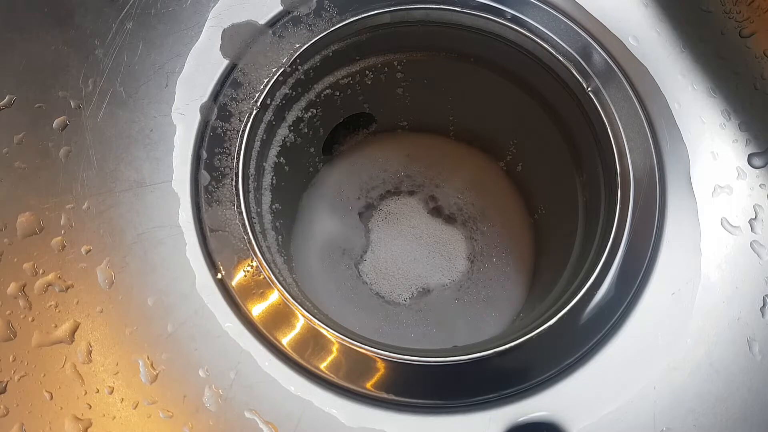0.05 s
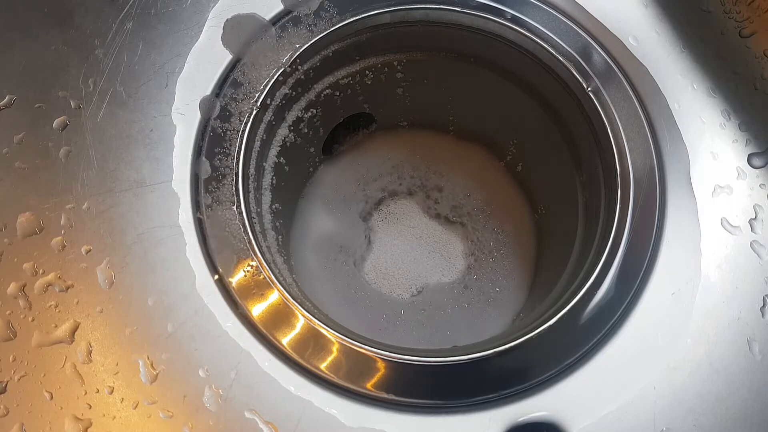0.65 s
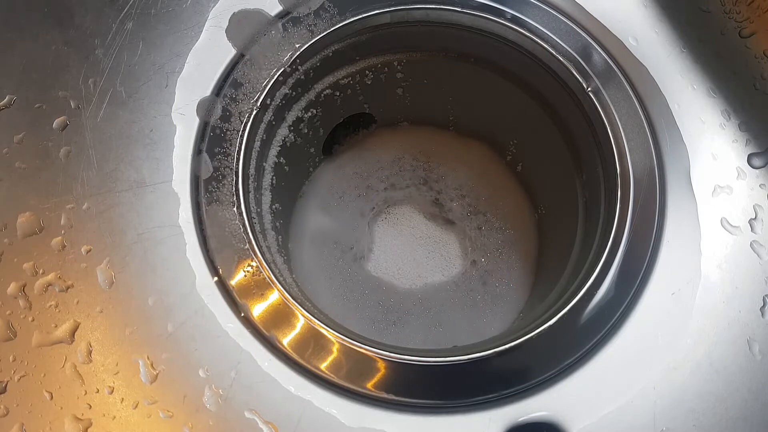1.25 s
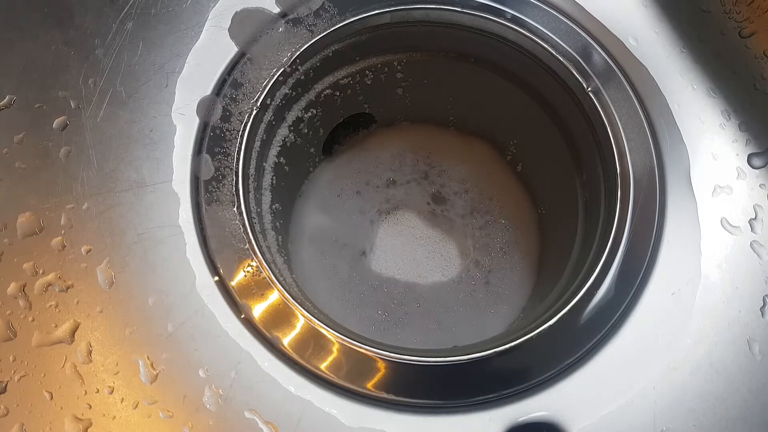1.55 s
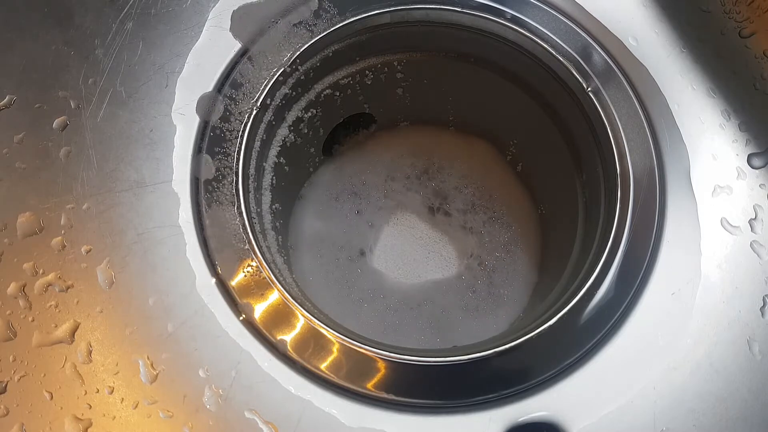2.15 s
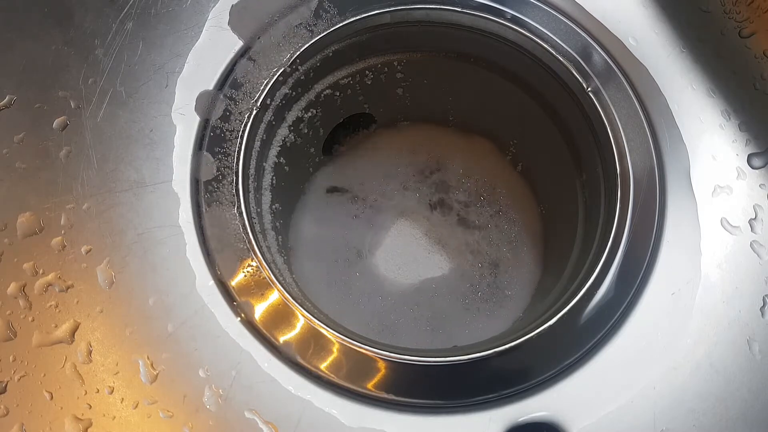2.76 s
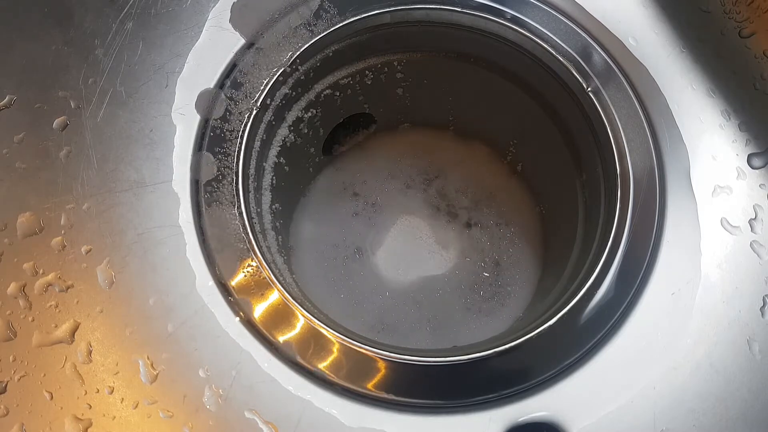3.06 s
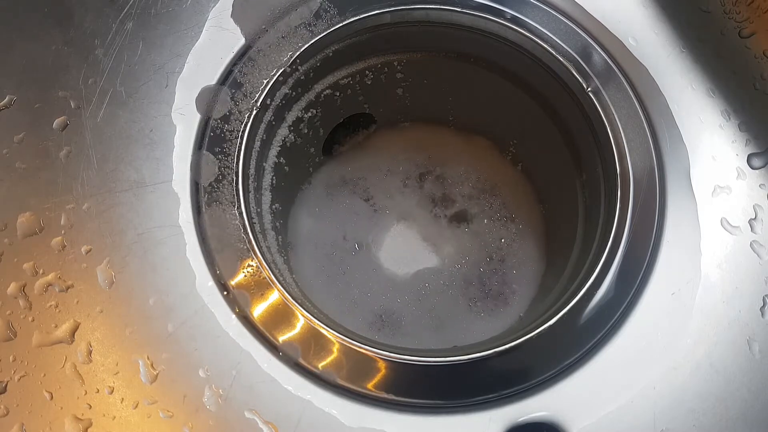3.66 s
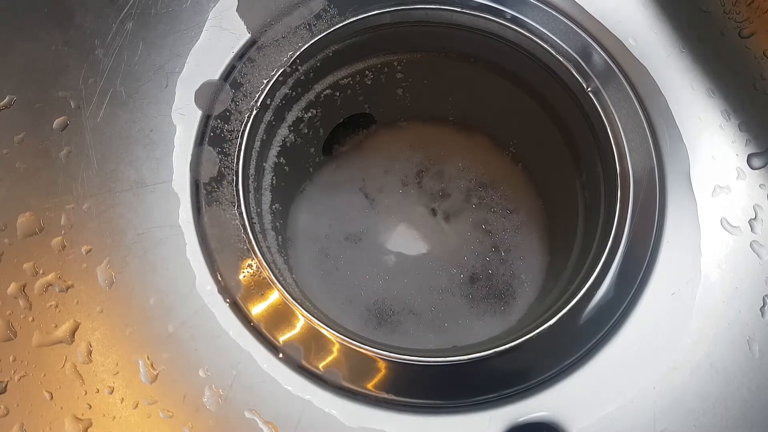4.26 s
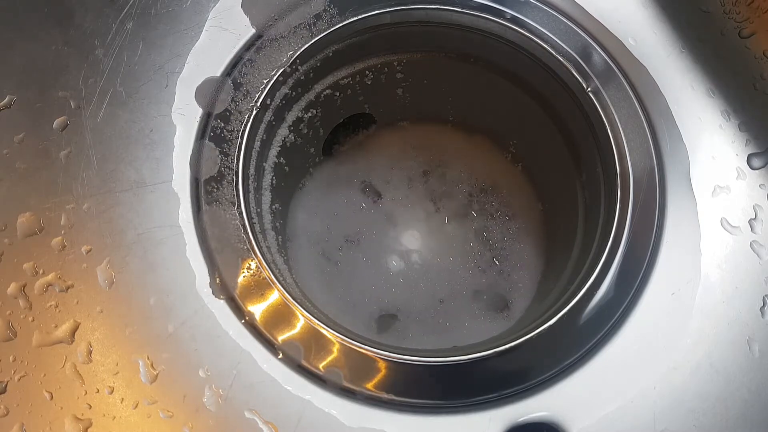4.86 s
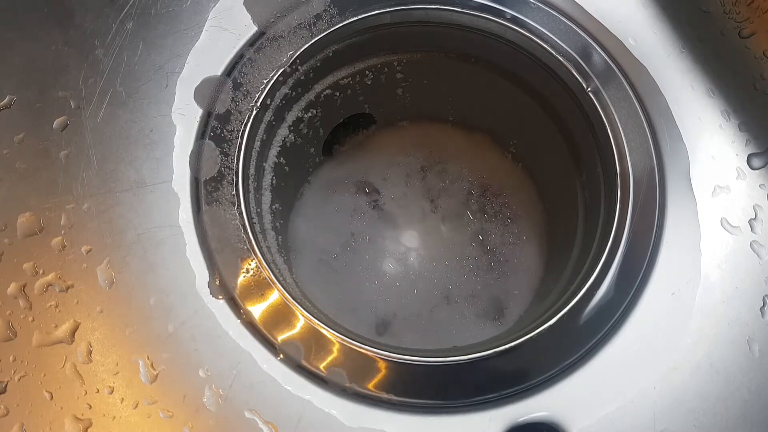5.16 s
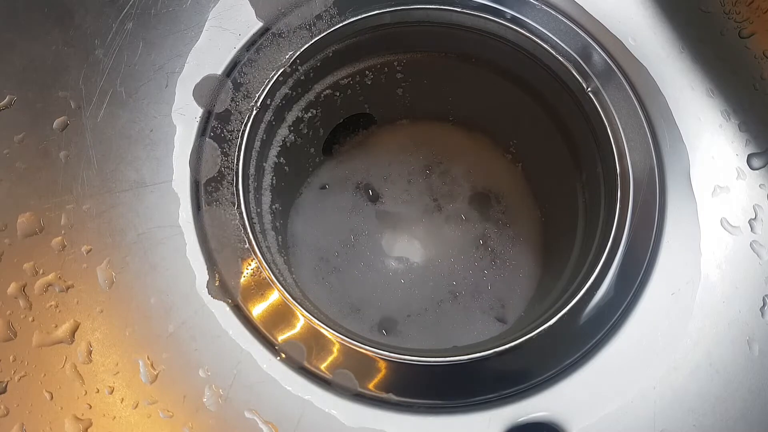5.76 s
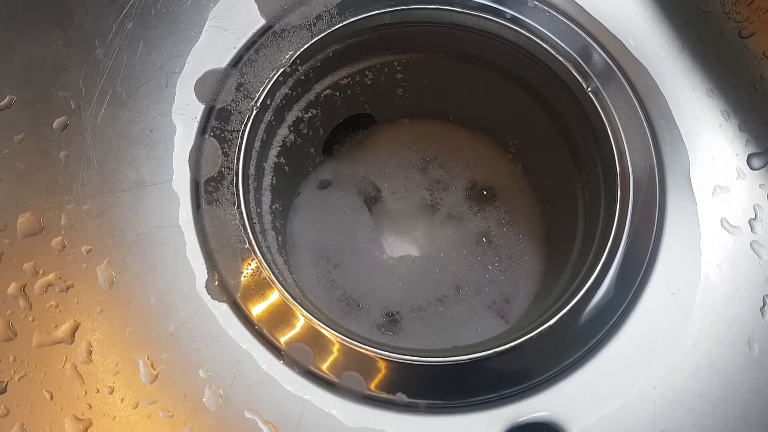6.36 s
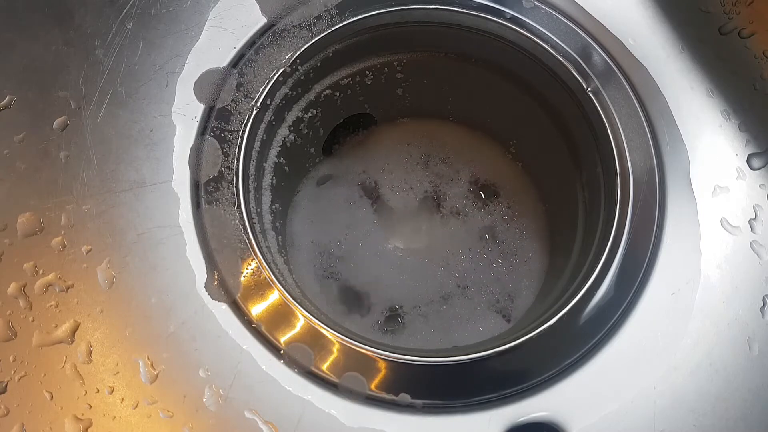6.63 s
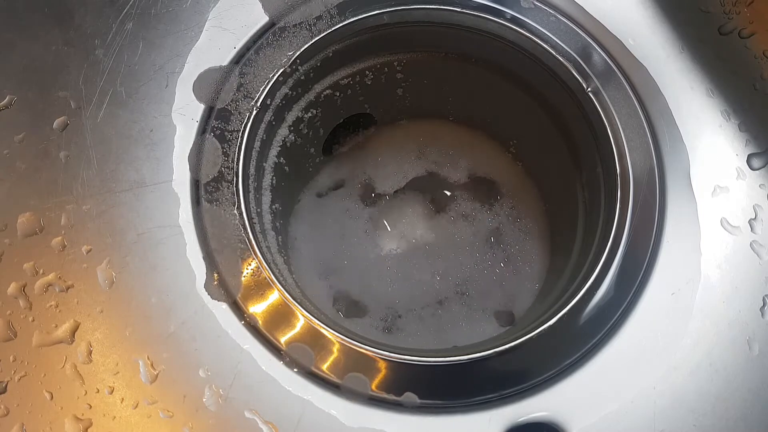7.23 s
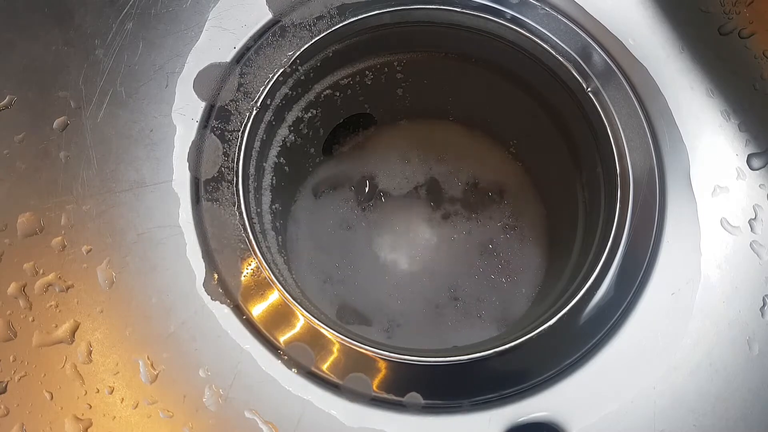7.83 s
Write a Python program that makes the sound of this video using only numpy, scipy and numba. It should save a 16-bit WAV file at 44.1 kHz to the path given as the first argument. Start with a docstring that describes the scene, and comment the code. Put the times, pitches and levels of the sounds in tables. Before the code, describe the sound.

Granules fizz softly in hot water in the steel drain cup of a kitchen sink, heard from just above for about eight seconds. A steady, slightly wavering motor hum and a low room rumble lie under it throughout. In the first half second a rush of gas crackles, then settles into a fine, prickly hiss of countless tiny bursting bubbles. The hiss eases a little from about 3 seconds while larger bubbles gradually swell into a lower, slightly hollow simmer. Soft plops come at about 1.5, 2.4, 4.5 and 5.2 seconds, and tiny ticks and brief spurts of fizz are scattered between them. A very faint ring flickers in the froth near 1.8 and 6.6 seconds. From around 7 seconds the sizzle lifts and brightens, with a few more small plops as the bubbling continues to the end.

```python
"""Granules fizz in hot water in the steel drain cup of a kitchen sink, heard from just above it.
From the start a motor hums over the low rumble of the kitchen, and a first rush of gas crackles
and settles into the fine hiss of countless tiny bursting bubbles. As the foam coarsens, larger
bubbles simmer lower down and swell, dotted with plops, ticks and a faint ring. Near the end
the sizzle lifts as the last of the heap breaks apart."""
import sys
import numpy as np
from scipy import signal
from scipy.fft import rfft, irfft
from scipy.io import wavfile
from scipy.ndimage import uniform_filter1d
from numba import njit

SR = 44100
rng = np.random.default_rng(int(sys.argv[2]) if len(sys.argv) > 2 else 0)


def persist_wave(psi):
    """Save psi, clipped to +-1, as 16-bit WAV."""
    counts = np.round(np.clip(psi, -1, 1) * 32767).astype(np.int16)
    wavfile.write(sys.argv[1], SR, np.atleast_2d(counts).T)


N = 356769
T = np.arange(N) / SR
PROGRESS = T / T[-1]

# tone of the fine fizz as it leaves the cup towards each side: freq_hz, left_db, right_db
FIZZ_EQ = [(1510, -20, -9.5), (2460, -9, -14.5), (3070, -10, -12.5), (3620, -8, -11), (3920, -5, -1.5),
           (4330, -10.5, -2), (4880, -1.5, 1), (5880, -6, -2.5), (6600, -6, 1), (7700, -5.5, -2.5),
           (8130, -3.5, -9), (8620, 1, -4), (10140, 0.5, -3.5), (12560, 4.5, 3), (13450, -1.5, -1.5),
           (14400, -1.5, -3.5)]


def amp(db):
    """Decibels to gain."""
    return 10 ** (np.asarray(db) / 20)


def level(x, db):
    """Scale a sound to an rms level."""
    return x * amp(db) / np.sqrt(np.mean(x ** 2))


def colour(x, table):
    """EQ through rows of freq_hz, gain_db; one gain column for both sides or one for each."""
    hz, *columns = np.transpose(table)
    log_f = np.log(np.fft.rfftfreq(N, 1 / SR) + 1)
    return irfft(rfft(x) * amp([np.interp(log_f, np.log(hz), c) for c in columns]), N)


def pan(x, left_db):
    """Place a sound by its left minus right level."""
    return x * amp(np.array([[left_db], [-left_db]]) / 2)


def bumps(table):
    """Bell-shaped swells from rows of centre_s, half_length_s, height."""
    return sum(height * np.exp(-.5 * ((T - s) / length) ** 2) for s, length, height in table)


def walk(rate):
    """Smooth random drift with an rms of 1 that turns about rate times a second."""
    size = int(SR / rate)
    steps = np.repeat(rng.standard_normal(N // size + 1), size)
    return level(uniform_filter1d(uniform_filter1d(steps, size), size)[:N], 0)


def sine(hz):
    """A tone with an rms of 1 that follows a pitch curve."""
    return np.sqrt(2) * np.sin(2 * np.pi * np.cumsum(hz) / SR)


@njit
def ring_grains(start, hz, cycles, size, glide):
    """Damped sines, start in samples; each dies by 50 dB over its cycles as glide bends it up."""
    out = np.zeros(N)
    for k in range(len(start)):
        length = cycles[k] * SR / hz[k]
        turn = 2 * np.pi * hz[k] / SR
        step = np.exp(1j * turn - 5.76 / length)
        bend = np.exp(1j * turn * glide / length)
        first = int(start[k]) + 1
        phasor = size[k] * step ** (first - start[k])
        for i in range(first, min(N, first + int(length))):
            out[i] += phasor.imag
            phasor *= step
            step *= bend
    return out


def bubbles(per_s, low_hz, high_hz, cycles, spread_db, glide, echo, echo_s):
    """Random bubbles; each reaches both sides directly and again by its own bounce off the steel."""
    when, pitch, damping, strength, *paths = rng.random((int(per_s * N / SR), 6)).T
    hz = low_hz + (high_hz - low_hz) * pitch
    turns = cycles * (.5 + damping)
    # few bubbles are loud; short high rings carry as much energy as long low ones
    size = amp(-spread_db * np.log(np.maximum(strength, .002))) * np.sqrt(hz / turns)
    direct = ring_grains(when * N, hz, turns, size, glide)
    bounced = [ring_grains(when * N + path * echo_s * SR, hz, turns, size, glide) for path in paths]
    return level(direct + echo * np.array(bounced), 0)


def kitchen():
    """Room tone: a low rumble, nearly the same on both sides, whose bass swells and ebbs."""
    # tone of the room: freq_hz, gain_db
    rumble_eq = [(15, -26), (45, -11.5), (66, -10), (92, -2), (118, -2.5), (137, .5), (160, -4.5),
                 (195, -8.3), (225, -13.5), (270, -17), (310, -23.5), (400, -33), (540, -33.5),
                 (680, -32.5), (780, -34.5), (950, -36), (1200, -39.5), (3000, -58.5)]
    # swells and dips of the bass: centre_s, half_length_s, gain_db
    bass_swells = [(.2, 0.11, 2.5), (1.56, 0.05, 1.5), (4.6, 0.23, -2), (5.75, 0.22, 2),
                   (6.68, 0.033, -3.5)]
    centre = rng.standard_normal(N)
    sides = colour(rng.standard_normal((2, N)), [(150, -16.5), (260, -12), (350, -1), (1000, 5)])
    rumble = level(colour(centre + sides, rumble_eq), -45)
    bass = colour(rumble, [(220, -3), (400, -39)])
    return pan(rumble + (amp(bumps(bass_swells)) - 1) * bass, left_db=.5)


def motor(overtone_hz=105.03, waver_hz=1.527, drone_hz=101.24):
    """Steady shaft and mains hum; a booming overtone wavers and beats against a restless drone."""
    # steady tones of motor and mains: pitch_hz, level_db
    hum_tones = [(51.85, -41), (100, -67.5), (198.5, -62.5)]
    # brief dips in the booming overtone: centre_s, half_length_s, gain_db
    boom_dips = [(1.85, .02, -7), (4.17, 0.038, -10), (4.47, 0.048, -6), (6.68, 0.034, -10),
                 (6.98, 0.016, -8)]
    hum = sum(amp(db) * sine(hz + .12 * walk(1.93)) for hz, db in hum_tones)
    boom = sine(overtone_hz + waver_hz * walk(24))
    boom_db = -41.5 + .43 * walk(15) + bumps(boom_dips)
    drone = np.real((walk(14) + 1j * walk(14)) * np.exp(2j * np.pi * drone_hz * T))
    drone_db = -56 + 3.5 * PROGRESS
    return pan(hum + boom * amp(boom_db) + drone * amp(drone_db), left_db=1.9)


def faint_ring(pitch_hz=1264, roughness=.4, rough_per_s=70):
    """A faint, nearly pure ring comes and goes in the froth."""
    # swells of the ring: centre_s, half_length_s, gain_db
    swells = [(.12, .067, -70), (1.665, .018, -68), (1.775, .016, -62), (1.878, .016, -60),
              (2.078, .03, -68), (6.448, .026, -64.5), (6.558, .014, -61), (6.609, .021, -57.8)]
    envelope = bumps([(s, length, amp(db)) for s, length, db in swells])
    flutter = 1 + roughness * (walk(rough_per_s) + 1j * walk(rough_per_s))
    tone = np.real(flutter * np.exp(2j * np.pi * pitch_hz * T))
    return pan(level(tone, -2.2) * envelope, left_db=-4)


def basin(x, wall_s=.00279, wall_gain=.093):
    """The sink walls send back one close echo and ring at resonances that each side hears differently."""
    # narrow resonances of the steel: freq_hz, width_hz, left_lift_db, right_lift_db
    modes = [(335, 15, 5.5, 9), (382, 30, -3.5, -1), (537, 73, 4, 0), (614, 25, -0.5, 2), (693, 35, 3, 3),
             (1056, 20, 1, 3.5), (1214, 27, -2, 0.5), (1270, 27, 5, 4), (1444, 31, 3, 7.5),
             (1516, 24, 6, 2.5), (1650, 40, 5.5, -4), (1820, 46, 5.5, 5.5), (1960, 32, 7, 6.5),
             (2053, 44, 5.5, 3.5), (2640, 66, 1.5, 5.5), (3144, 44, 3, 5.5), (4160, 110, 4, 1.5),
             (5000, 150, -1, -1.5), (5440, 160, 2.5, -2), (6130, 80, -3, 2.5), (6370, 100, 6.5, -4.5),
             (6900, 81, -2, 2.5), (7550, 120, -1, 2), (10000, 130, 4, -1), (10476, 70, -1, 0)]
    f = np.fft.rfftfreq(N, 1 / SR)
    echo = 1 + wall_gain * np.exp(-2j * np.pi * f * wall_s)
    resonance = 1 + sum((amp([[left_db], [right_db]]) - 1) / (1 + 2j * (f - hz) / width)
                        for hz, width, left_db, right_db in modes)
    return irfft(rfft(x) * echo * resonance, N)


def plops(glide=.059):
    """Gas rises in the drain as single big bubbles, each ringing from its own spot in the cup."""
    # soft plops: start_s, pitch_hz, level_db, ring_cycles, left_minus_right_db
    big_bubbles = [(1.502, 365, -48, 17, 2), (1.506, 1840, -63, 50, -2), (2.432, 390, -51, 12, 0),
                   (4.541, 1020, -54, 48, -1), (4.558, 690, -53, 22, -2), (5.19, 1810, -60, 76, -2),
                   (5.218, 1940, -59, 70, 2), (7.402, 2040, -60, 60, 0), (7.628, 1033, -55, 36, -3),
                   (7.848, 624, -51, 24, 2), (7.946, 1050, -54, 36, -6)]
    out = np.zeros((2, N))
    for s, hz, db, cycles, left_db in big_bubbles:
        grain = np.array([[s * SR], [hz], [cycles], [amp(db)]])
        out += pan(ring_grains(*grain, glide), left_db)
    return out


def ticks(cycles=7):
    """Single bubble skins snap on top of the foam."""
    # distinct snaps: start_s, pitch_hz, level_db
    snaps = [(.273, 3100, -57), (1.511, 3100, -56), (1.879, 2400, -55), (4.235, 3100, -54),
             (4.426, 3000, -55), (5.477, 6500, -52), (5.829, 2700, -55), (6.298, 11000, -50),
             (6.585, 3100, -52), (6.906, 11000, -50), (7.25, 2900, -53)]
    s, hz, db = np.array(snaps, float).T.copy()
    return ring_grains(s * SR, hz, np.full(len(s), cycles, float), amp(db), 0.)


def prickle(db, cluster_db=3, clusters_per_s=30):
    """Bubbles on top of the foam snap in little clusters."""
    snaps = bubbles(per_s=900, low_hz=3700, high_hz=12640, cycles=26,
                    spread_db=2.5, glide=.01, echo=1, echo_s=.002)
    clusters = amp(cluster_db * np.tanh(walk(clusters_per_s)))
    return level(colour(snaps, FIZZ_EQ) * clusters, db)


def froth(start_db=-64.5, end_db=-56.5, rush_db=7, rush_s=.21, drift_db=3.5):
    """Larger bubbles build up in the foam; they ring lower and longer, rising in pitch as they surface."""
    # tone that cup and basin give the froth: freq_hz, left_db, right_db
    froth_eq = [(251, -17, -6.5), (483, -1.5, 0), (654, -3, 2), (760, -12, -4), (1080, -15, -3),
                (1110, -20, -6.5), (1420, -7, -4.5), (1443, -14, -10.5), (1640, -7, -9), (2050, -13.5, -12),
                (2430, -18.5, -21.5), (2960, -26.5, -13.5), (3430, -27.5, -19.5), (4330, -26, -18.5)]
    # surges and lulls of the cup's hollow burble: centre_s, half_length_s, gain_db
    surges = [(.6, .3, -4), (2.45, 0.13, 3), (6.85, .1, 2), (7.6, .03, 0), (7.86, 0.03, 2)]
    blips = bubbles(per_s=10000, low_hz=280.3, high_hz=5420, cycles=14.5,
                    spread_db=2, glide=.029, echo=1.38, echo_s=.005)
    # the stereo image narrows around 700 Hz
    mid = blips.mean(axis=0)
    sides = colour(blips - mid, [(300, .5), (700, -9.5), (1100, .5), (1900, -1.5), (2600, .5)])
    blips = level(colour(mid + sides, froth_eq), 0)
    # the first rush of gas crackles and settles, then the foam brightens as it opens
    treble = colour(blips, [(900, -27), (1900, -5), (2800, 0)])
    treble_db = -4 + 6 * PROGRESS + rush_db * np.exp(-T / rush_s)
    burble = colour(blips, [(750, -5), (1100, -31)])
    simmer = blips + (amp(treble_db) - 1) * treble + (amp(bumps(surges)) - 1) * burble
    coarseness = PROGRESS ** .83
    build_db = 10 * np.log10((1 - coarseness) * amp(start_db) ** 2 + coarseness * amp(end_db) ** 2)
    # the liveliest patch of foam creeps to the left
    pan_db = drift_db * (PROGRESS - .5) * np.array([[.5], [-.5]])
    return simmer * amp(build_db + pan_db + .38 * walk(8.2))


def fizz(db, spurt_s=.012, breakup_s=7.5):
    """Tiny bubbles burst by the thousand, in slightly uneven flurries and a few spurts."""
    # spurts where a patch of foam collapses: centre_s, level_db
    collapses = [(2.773, -63), (4.464, -62), (5.44, -67), (5.47, -62.5), (6.575, -64), (7.269, -66)]
    pops = bubbles(per_s=22000, low_hz=1820, high_hz=15400, cycles=7.9,
                   spread_db=0, glide=.051, echo=1.58, echo_s=.003)
    pops = level(colour(pops, FIZZ_EQ), 0)
    # the finest sizzle gains as the granules dissolve and swells as the heap breaks apart
    sizzle = colour(pops, [(9000, -32), (13500, .5)])
    sizzle_db = -5 + 3.5 * PROGRESS + bumps([(breakup_s, .8, 2.5)])
    spurts = sum(amp(peak_db) * np.exp(-((T - s) / spurt_s) ** 2) for s, peak_db in collapses)
    flurries = amp(db + .49 * walk(15) + .25 * walk(6))
    return (pops + (amp(sizzle_db) - 1) * sizzle) * np.hypot(flurries, spurts)


def scene():
    """The foaming drain cup close up in its steel basin, with motor and room tone behind it."""
    # the fine fizz eases after the first rush and picks up as the heap breaks apart: time_s, level_db
    fizz_fader = [(0, -61), (.7, -62), (1.7, -62), (2.8, -63.5), (5.6, -64), (6.6, -64), (7.6, -62.2),
                  (8.09, -62)]
    fizz_db = np.interp(T, *np.transpose(fizz_fader))
    cup = fizz(fizz_db) + prickle(fizz_db - 11) + froth() + plops() + ticks()
    return basin(cup) + faint_ring() + motor() + kitchen()


def record(dry, top_hz=14100):
    """Two microphone ports hear the lows and mids out of step; a steep low-pass cuts the top."""
    # phase between the ports above the basin: freq_hz, left_lead_rad
    port_phase = [(100, -.25), (350, 0), (850, -.25), (1030, 1.2), (1200, .6), (1430, 1.2), (1900, 0)]
    lead = np.interp(np.fft.rfftfreq(N, 1 / SR), *np.transpose(port_phase))
    ports = irfft(rfft(dry) * np.exp(.5j * np.array([lead, -lead])), N)
    return signal.sosfilt(signal.ellip(8, .2, 70, top_hz, fs=SR, output="sos"), ports)


dry = scene()
out = record(dry)
persist_wave(out)
```